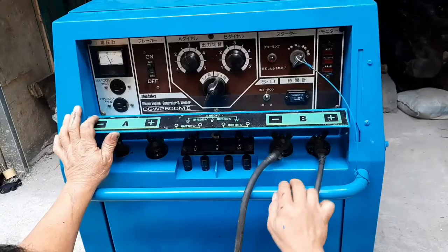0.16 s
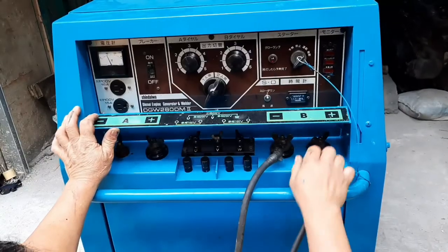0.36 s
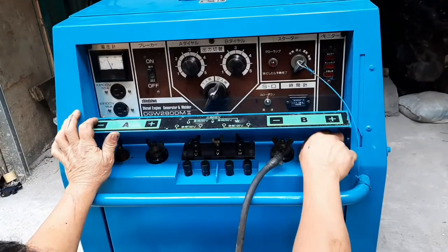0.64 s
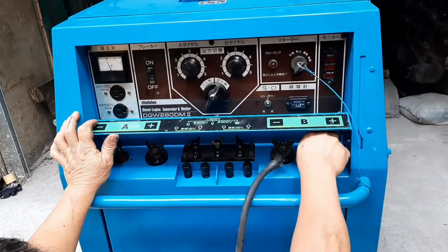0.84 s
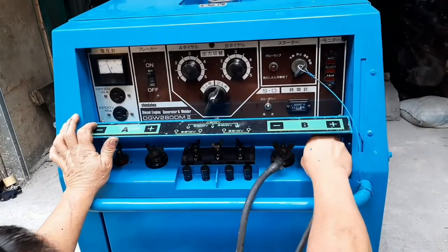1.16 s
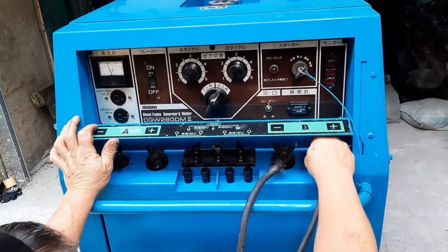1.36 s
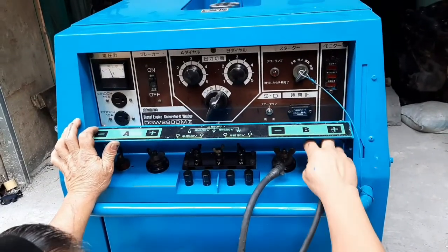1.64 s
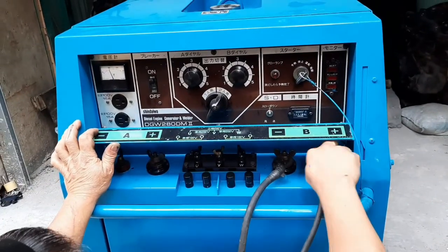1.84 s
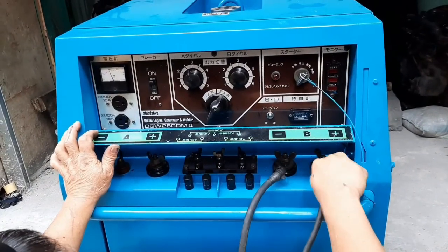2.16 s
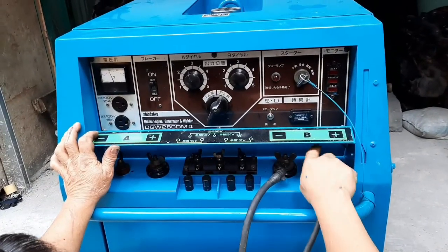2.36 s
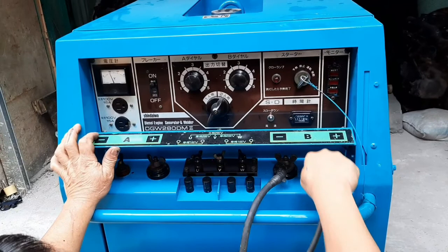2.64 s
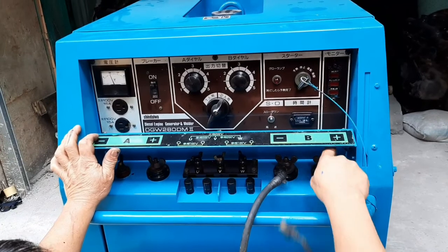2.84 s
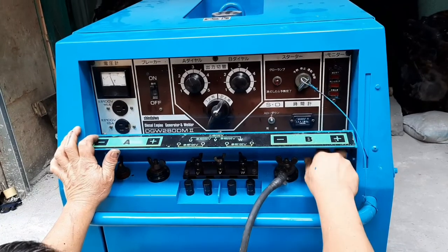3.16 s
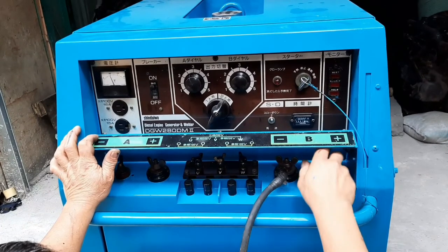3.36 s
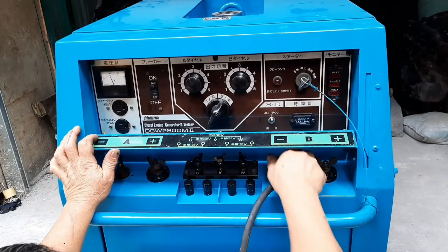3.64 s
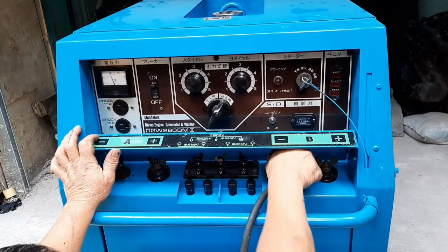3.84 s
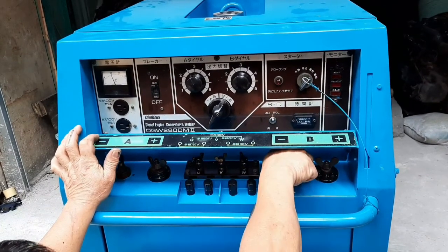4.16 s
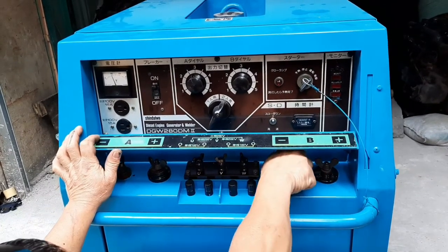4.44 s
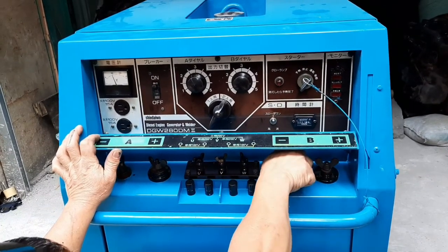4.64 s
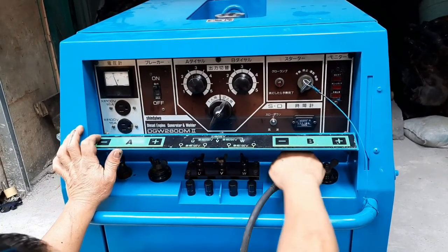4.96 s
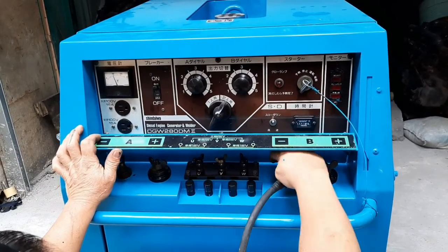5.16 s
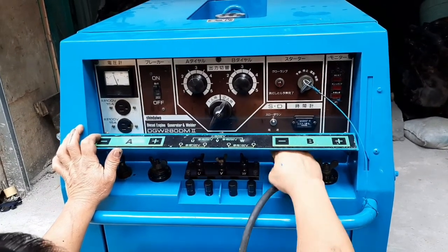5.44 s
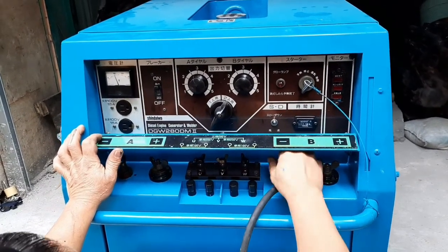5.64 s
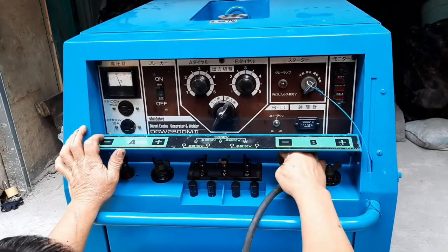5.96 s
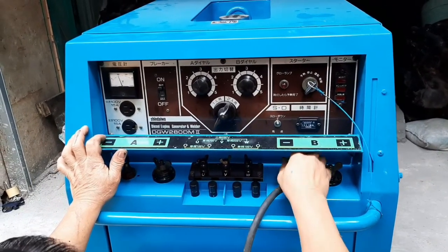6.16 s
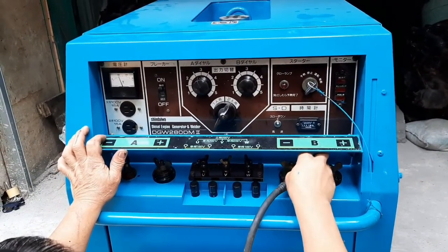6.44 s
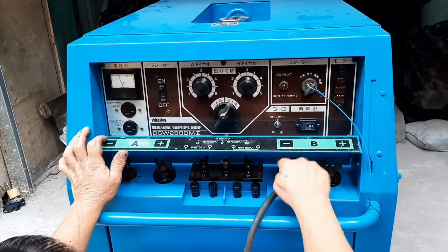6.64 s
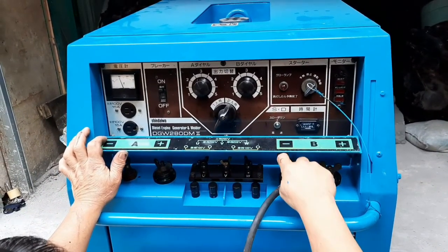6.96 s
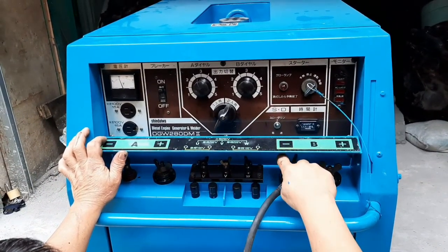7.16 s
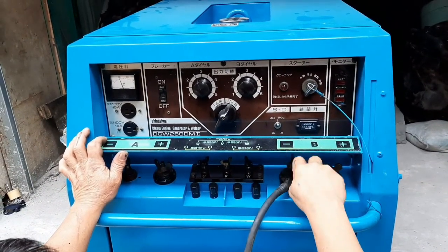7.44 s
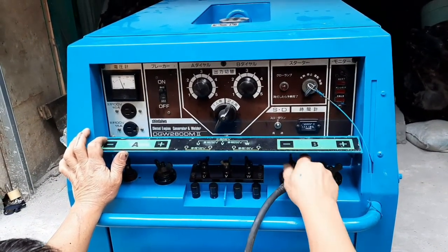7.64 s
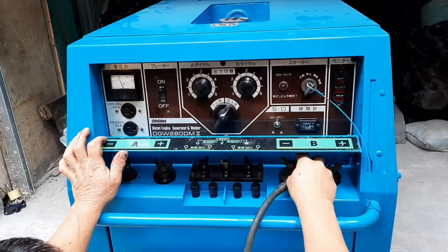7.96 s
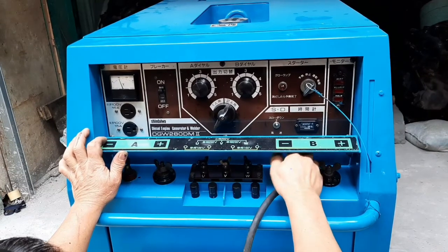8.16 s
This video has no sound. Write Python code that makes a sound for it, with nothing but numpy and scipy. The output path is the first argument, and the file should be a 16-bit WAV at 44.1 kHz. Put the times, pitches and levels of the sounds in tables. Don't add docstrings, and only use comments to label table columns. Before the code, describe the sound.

A three-cylinder diesel generator runs very close, rising slightly in speed during the first second, then holding a dense, even drone. Fan and exhaust air rush, valves knock, gears whine and the metal canopy booms and chatters. Small scrapes and clicks of cable plugs being twisted are half buried in the roar. Stereo microphone at arm's length outdoors on concrete, with light low wind buffets.

```python
import sys
import numpy as np
from scipy import signal
from scipy.fft import rfft, irfft, next_fast_len
from scipy.io import wavfile
from scipy.ndimage import uniform_filter1d

SR = 44100
rng = np.random.default_rng(int(sys.argv[2]) if len(sys.argv) > 2 else 0)


def amplitude_ratio(level_db):
    exponent = np.asarray(level_db, float) / 20
    return 10 ** exponent


def dump(signal):
    limited = np.clip(np.atleast_2d(signal).T, -1, 1)
    pcm = np.round(limited * 32767).astype(np.int16)
    wavfile.write(sys.argv[1], SR, pcm)


N = 366030


def evened(x):
    return x / np.sqrt(np.mean(x ** 2, axis=-1, keepdims=True) + 1e-20)


def read(points, hz, column=1):
    columns = np.transpose(points)
    return np.interp(np.log(hz + 1), np.log(columns[0] + 1), columns[column])


def coloured(x, points):
    length = x.shape[-1]
    size = next_fast_len(length)
    gain = amplitude_ratio(read(points, np.fft.rfftfreq(size, 1 / SR)))
    return irfft(rfft(x, size) * gain, size)[..., :length]


def drift(top_hz, count=1):
    steps = np.arange(0, N + 256, 256)
    spectrum = rfft(rng.standard_normal((count, len(steps))))
    hz = np.fft.rfftfreq(len(steps), 256 / SR)
    slow = evened(irfft(spectrum / (1 + (hz / top_hz) ** 4), len(steps)))
    return np.array([np.interp(np.arange(N), steps, row) for row in slow])


def bumps(rows, column):
    out = np.zeros(N)
    for row in rows:
        centre_s, length_s = row[:2]
        u = np.arange(0, 3 * length_s, 1 / SR) / (0.3 * length_s)
        swell = amplitude_ratio(row[column]) * u * np.exp(1 - u)
        part = out[round((centre_s - .4 * length_s) * SR):][:len(u)]
        part += swell[:len(part)]
    return out


# frequency in Hz, likeness 0-1, left-right level in dB.
PORT_LIKENESS = [(60, 0.74, 7), (130, 1, 1), (290, 0.96, -1.5), (640, 0.74, 8), (1100, 1, 2.5),
                 (2520, 0.14, -5.5), (4420, 0.038, 0), (8600, 0.024, 6.5), (15000, 0.058, 5.5)]


def port_noise():
    a, b = rfft(rng.standard_normal((2, N)))
    hz = np.fft.rfftfreq(N, 1 / SR)
    same = np.clip(read(PORT_LIKENESS, hz), -1, 1)
    lean = amplitude_ratio(read(PORT_LIKENESS, hz, column=2) / 2)
    lead_s = 1.2e-4
    left = a * lean * np.exp(2j * np.pi * hz * lead_s)
    right = (same * a + np.sqrt(1 - same ** 2) * b) / lean
    return irfft([left, right], N)


# time in seconds, speed in rpm.
SPEED = [(.03, 1891.4), (.25, 1932.5), (.5, 1958.5), (.82, 1974.5), (1.25, 1971.6), (1.75, 1978.7),
         (2.5, 1975.2), (2.85, 1977.7), (3.8, 1977.8), (4.25, 1975.6), (4.7, 1979.2), (5.25, 1975.2),
         (5.55, 1980.0), (6.25, 1973.8), (6.5, 1976.2), (7.25, 1976.4), (7.65, 1980.6), (8.3, 1970.5)]
# speed in rpm, level in dB.
EXHAUST_BOOM = [(1945, -24), (1974, -26.3)]
# speed in rpm, level in dB.
PUMP_WHINE = [(1915, -40), (1934, -42), (1944, -50), (1958, -48), (1970, -42.5), (1980, -41)]
PUMP_LEAD = [(1905, 1.3), (1958, 3.8), (1976, 3.1), (1980, 4.0)]
# speed in rpm, level in dB.
TIMING_WHINE = [(1920, -58), (1950, -48), (1973, -51), (1979, -43)]


def crank():
    rpm = np.interp(np.arange(N) / SR, *np.transpose(SPEED))
    laws = (EXHAUST_BOOM, PUMP_WHINE, PUMP_LEAD, TIMING_WHINE)
    gears = [np.interp(rpm, *np.transpose(law)) for law in laws]
    return np.cumsum(rpm) / (120 * SR), rpm, gears


def order_tone(cycles, multiple, db, lean_db, lead_rad):
    chance = rng.random()
    start = multiple ** 2 / 21 + .1 * chance if multiple < 33 else chance
    turn = 2 * np.pi * (multiple * cycles + start)
    lean = amplitude_ratio(lean_db)
    pair = np.array([lean * np.cos(turn + lead_rad), np.cos(turn)])
    return 2 * amplitude_ratio(db) / np.hypot(1, lean) * pair


# multiple of the four-stroke cycle, level in dB rms, left-right in dB, left lead in rad.
FIRING_ORDERS = [(3, -35, 1, 0.1), (9, -39, 1, 0.0), (12, -44, 1, 0.0), (15, -37, 2, -0.2),
                 (18, -39, 1, 0.2), (21, -34, 7, -0.1), (24, -36, 3, -0.1), (27, -43, 4, -0.1),
                 (30, -50, 5, 0.2), (36, -49, 2, -0.3), (42, -49, 2, -0.7), (45, -51, 9, 0.8),
                 (48, -55, 14, -3.1), (51, -50, -3, -0.6), (54, -52, 15, -2.5), (60, -55, -3, 1.4),
                 (78, -53, -3, -2.5), (81, -57, -1, 1.0)]
# cycle multiple, level in dB
# rms, left-right in dB, left lead in rad.
BLOCK_ORDERS = [(11, -44, 2, -0.2), (13, -41, 1, -0.0), (16, -38, 2, 0.3), (17, -41, 0, 0.0),
                (19, -38, 0, -0.2), (20, -40, 2, 0.2), (22, -37, 1, -0.3), (23, -41, -4, 0.1),
                (25, -37, 3, -0.4), (26, -41, 6, -0.6), (28, -46, 4, -0.2), (29, -44, 2, 0.4),
                (31, -45, 0, 0.7), (32, -43, 5, 0.6), (34, -46, 8, -0.2), (35, -42, 7, -0.1),
                (37, -38, 5, 0.1), (40, -46, 4, 0.1), (41, -48, 5, 0.2), (43, -51, 3, 1.4),
                (44, -41, 5, -0.4), (46, -45, 5, -0.4), (47, -49, 3, -0.1), (50, -46, 1, 0.0),
                (53, -55, 3, -0.2), (56, -53, -2, 1.4), (62, -56, 2, 2.3), (64, -56, -6, -1.0),
                (70, -54, 1, -1.4), (76, -53, 4, 0.1),
                (4, -49, 1, 0), (8, -52, 1, 0), (38, -53, 3, 0), (39, -57, 3, 0), (49, -56, 3, 0),
                (57, -58, 2, .5), (63, -61, 1, 0), (66, -63, 1, 0)]
# cycle multiple, level in dB rms, left-right in dB, left lead in rad.
CLATTER_ORDERS = [(90, -62, -1, 1.5), (91, -57, 6, 0.2), (93, -57, 5, 0.3), (96, -59, -3, 1.1),
                  (98, -62, 8, 3.0), (100, -59, 0, -2.4), (120, -56, -6, -2.1), (121, -53, -10, 0.2),
                  (122, -56, -11, 0.9), (123, -55, -8, 1.6), (128, -54, -14, -0.7), (129, -54, 1, 1.2),
                  (132, -57, 13, -2.3), (135, -53, -16, 0.1), (136, -56, -12, 0.6), (137, -57, -17, 0.3),
                  (138, -56, -18, -1.1), (139, -55, 1, 1.4), (145, -54, -10, -2.2), (147, -57, -6, 1.0),
                  (151, -54, -8, 1.1), (152, -56, -13, -1.6), (153, -54, -3, 0.3), (159, -56, -3, -0.8),
                  (160, -57, -8, 0.7), (163, -56, -8, 1.8), (165, -56, -14, 1.6), (167, -56, -2, 0.0)]
# cycle multiple, change in dB at 1905 rpm, change in dB at 1940 rpm.
SETTLING = [(3, 5, 3), (13, 4, 7), (16, 1, 5), (18, 6, 0), (20, -5, 6), (21, -10, 3), (26, 5, 3),
            (27, -10, -3), (29, -4, -7), (31, 6, 5), (41, 0, 3), (46, -3, -4), (47, 0, 4), (35, -8, -7),
            (36, -7, -4), (37, -8, 0), (38, 8, 7), (39, 9, 11), (43, 6, 8), (44, -12, -5), (45, -8, 6),
            (49, 5, 7), (56, 4, 10), (57, 7, 7), (63, 10, 4), (66, 10, 2), (70, -12, 1)]


def drone(cycles, rpm, gears):
    boom_db, pump_db, pump_lead_rad, timing_db = gears
    waver_db = .7 * drift(3, count=8)
    swept_db = {k: np.interp(rpm, [1905, 1940, 1970], [low_db, mid_db, 0]) for k, low_db, mid_db in SETTLING}
    out = order_tone(cycles, 6, boom_db, 1.3, .14)
    for k, db, lean_db, lead_rad in FIRING_ORDERS + BLOCK_ORDERS + CLATTER_ORDERS:
        wander_db = waver_db[k % 8] * min(k / 20, 2)
        out += order_tone(cycles, k, db + swept_db.get(k, 0) + wander_db, lean_db, lead_rad)
    fan_db = -28 + 1.6 * waver_db[0] + np.interp(rpm, [1930, 1960], [-14, 0])
    out += order_tone(cycles, 12.257, fan_db, 1, .1)
    out += order_tone(cycles, 68, pump_db, 1.5, pump_lead_rad)
    cold_db = np.interp(cycles, [22, 28], [-2, 0])
    return out + order_tone(cycles, 116, timing_db + cold_db, 2, .1)


# place in the cycle 0-1, level in dB.
KNOCKS = [(.1, 1), (.15, 3), (.22, 2), (.27, 0), (.49, 7), (.56, 2), (.63, 2), (.7, 2), (.8, 1), (.89, 7),
          (.96, 0)]
# frequency in Hz, level in dB.
CASING = [(700, -40), (900, -12), (1300, -12), (1450, -14), (1900, -4), (2200, -1), (2800, 0), (3250, -10),
          (3700, -22), (7000, -30), (9000, -48)]


def knocks(cycles):
    t = np.arange(1800) / SR
    out = np.zeros((2, N))
    for place, db in KNOCKS:
        at = np.flatnonzero(np.diff(np.floor(cycles - place)))
        train = np.zeros(N)
        train[at] = amplitude_ratio(db + 2.5 * rng.standard_normal(len(at)))
        decay = amplitude_ratio(-60 * t / 0.03)
        rise = 1 - np.exp(-t / 0.0015)
        ring = rng.standard_normal((2, len(t))) * decay * rise
        out += signal.oaconvolve(train[None], ring, axes=1)[:, :N]
    level_db = -43.5
    return amplitude_ratio(level_db) * evened(coloured(out, CASING)) * amplitude_ratio([[-1], [1]])


# frequency in Hz, density in dB per Hz.
ROAR = [(15, -94), (35, -79), (50, -63), (70, -60), (135, -60), (200, -54), (280, -53.5), (360, -56.5),
        (400, -56), (480, -62.5), (700, -74), (800, -69), (1200, -72.5), (1600, -109)]
# frequency in Hz, density in dB per Hz.
HISS = [(900, -94), (1200, -77), (1450, -75.5), (2000, -71), (2600, -70.5), (3100, -76), (3600, -80.5),
        (5000, -85.5), (7000, -91.5), (9300, -100), (11000, -98), (14500, -100), (15200, -104),
        (15600, -112)]
# frequency in Hz, width in Hz, level in dB rms.
PANELS = [(151.2, 9.4, -34.5), (402.5, 5.7, -42), (1538, 46, -56), (2400, 54, -76), (2480, 81, -67),
          (4260, 30, -65), (4980, 120, -61), (5980, 75, -64), (6900, 140, -65)]


def air():
    per_hz = np.sqrt(SR / 2)
    flicker_db = 1.3 * np.tanh(0.15 * drift(9)[0] + 0.8 * drift(20)[0])
    roar = coloured(port_noise(), ROAR) * per_hz
    hiss = coloured(port_noise(), HISS) * per_hz * amplitude_ratio(flicker_db)
    hz = np.fft.rfftfreq(N, 1 / SR)
    push = rfft(port_noise())
    shape = sum(amplitude_ratio(db) / np.sqrt(width) / (1 + (2 * (hz - f) / width) ** 2) for f, width, db in PANELS)
    return roar + hiss + irfft(push * shape, N) * per_hz


# frequency in Hz, width in Hz, level in dB.
BOOM_MODES = [
    (171.8, 9.4, -3.5),
    (319.5, 38, -3),
]
# centre in seconds, level in dB.
LOW_BUFFETS = [(.76, -22.5), (1.29, -23.5), (1.45, -36), (1.65, -26), (1.76, -28), (1.92, -28), (2.17, -31),
               (2.42, -31), (2.63, -42), (2.88, -27), (3.03, -26), (3.17, -34), (3.27, -37), (4.08, -31),
               (4.3, -30), (4.53, -27), (4.71, -29), (5.09, -30), (5.25, -33), (5.53, -25), (5.76, -29),
               (6.01, -35), (6.34, -43), (6.49, -29), (6.62, -28), (6.72, -21), (6.88, -31), (7.1, -31),
               (7.67, -26), (8.05, -29), (8.27, -27)]
# centre in seconds, level in dB.
HIGH_BUFFETS = [(.27, -34), (.36, -24), (1.4, -23), (1.62, -25), (1.91, -19), (2.15, -24), (2.26, -28),
                (2.58, -25), (2.72, -28), (2.9, -30), (3.68, -23), (3.91, -24), (4.04, -18), (4.22, -26),
                (4.4, -26), (4.66, -26), (4.85, -28), (5.13, -26), (5.25, -25), (5.55, -29), (5.84, -25),
                (5.91, -29), (6.26, -27), (7.07, -25), (7.61, -43), (8.14, -23)]


def booms():
    steady_db, lump_db, lump_hz = np.array([[-29.5], [-31.5]]), 2, 4.8
    steady = amplitude_ratio(steady_db + lump_db * drift(lump_hz, count=2))
    low = bumps([(s, 0.13, db) for s, db in LOW_BUFFETS], column=2)
    high = bumps([(s, 0.066, db) for s, db in HIGH_BUFFETS], column=2)
    levels = steady + np.array([low, high])
    hz = np.fft.rfftfreq(N, 1 / SR)
    push = rfft(port_noise())
    out = np.zeros((2, N))
    for (f, width, db), level in zip(BOOM_MODES, levels):
        ring = evened(irfft(push / (1 + (2 * (hz - f) / width) ** 2), N)[None])[0]
        swell = np.sqrt(uniform_filter1d((ring ** 2).mean(0), size=4000) + 0.061)
        out += ring / swell * amplitude_ratio([[.6], [-.6]]) * amplitude_ratio(db) * level
    return out


# centre in seconds, level in dB.
RATTLES = [(.86, -53), (.92, -45), (.96, -47), (1.05, -50), (1.1, -43), (1.17, -43), (1.26, -46),
           (1.35, -54), (1.41, -50), (1.82, -36), (2.12, -40), (2.6, -38), (2.96, -47), (3.78, -37.5),
           (4.54, -37), (5.33, -36), (5.72, -37.5), (5.78, -44), (5.94, -42), (6.64, -37), (6.9, -44),
           (7.23, -37), (7.27, -39), (7.36, -45), (7.53, -45), (7.62, -39), (7.66, -40), (8.0, -41)]
# frequency in Hz, level in dB.
SHEET = [(1000, -45), (1500, -30), (1900, -4), (2500, 0), (3000, -3), (3500, -12), (4200, -32), (7000, -65)]


def rattle(cycles):
    chatter_db, swing_db = -48.5, 14
    clumps = bumps([(s, .045, db) for s, db in RATTLES], column=2)
    lumps = amplitude_ratio(chatter_db + 6 * np.tanh(.8 * drift(16)[0]))
    since_firing = (3 * cycles - .45) % 1
    shaken = amplitude_ratio(-swing_db * uniform_filter1d(since_firing - .5, size=90))
    grain = amplitude_ratio(4 * np.tanh(.8 * drift(60)[0]))
    return evened(coloured(port_noise(), SHEET)) * (clumps + lumps) * shaken * grain


# centre in seconds, length in seconds, scrape in dB, rustle in dB.
RUBS = [(.25, .03, -45, -66), (.67, .03, -66, -49), (1.1, 0.033, -47, -66), (2.7, .03, -45, -63),
        (2.89, .07, -56, -57), (3.2, .05, -48, -49), (3.255, .045, -47, -46), (4.2, .04, -57, -60),
        (4.27, .025, -58, -59), (4.385, .04, -43, -54), (4.51, .015, -44, -46), (4.63, .03, -51, -64),
        (5.32, 0.022, -45, -54), (5.39, .025, -55, -52), (5.71, .04, -49, -61), (5.91, 0.067, -45, -56),
        (6.64, .04, -48, -65), (7.27, 0.11, -48, -61), (7.46, 0.078, -44, -54), (8.28, .03, -46, -59)]
# frequency in Hz, level in dB.
SCRAPE = [(1200, -20), (2500, -4), (3600, -2), (4400, 0), (5500, -5), (7000, -11), (10000, -30)]
# frequency in Hz, level in dB.
RUSTLE = [(4000, -22), (7000, -5), (10000, -3), (14000, 0), (15600, -3)]
# start in seconds, level in dB, ring in Hz, 60 dB decay in seconds.
CLICKS = [(3.199, -24, 2500, .012), (3.204, -27, 1720, .012), (6.1, -33, 1200, .015),
          (3.288, -33, 2600, .012), (5.314, -27, 1980, .02), (5.315, -30, 1150, .015),
          (4.715, -29, 705, .11), (2.78, -28, 562, .16), (1.92, -29, 515, .14), (3.198, -29, 1200, .015),
          (3.2, -27, 2050, .015), (4.365, -46, 3700, .07), (4.39, -44, 4200, .05), (4.39, -46, 3720, .05),
          (4.39, -51, 5300, .05), (4.38, -52, 4800, .03), (5.312, -45, 4200, .03), (5.323, -32, 2100, .015),
          (5.305, -34, 2700, .015), (2.0, -22, 298, .28), (3.5, -29, 560, .18)]


def hand():
    grain = amplitude_ratio(3 * np.tanh(drift(80, count=2)))
    out = evened(coloured(port_noise(), SCRAPE)) * bumps(RUBS, column=2) * grain[0]
    out += evened(coloured(port_noise(), RUSTLE)) * bumps(RUBS, column=3) * grain[1]
    t = np.arange(12000) / SR
    for s, db, hz, t60 in CLICKS:
        rise = 1 - np.exp(-10 * t / t60)
        ring = 3 * amplitude_ratio(db - 60 * t / t60) * rise * np.sin(2 * np.pi * hz * t)
        out[:, round(s * SR):][:, :len(t)] += ring
    return out


# centre in seconds, length in seconds, left in dB, right in dB.
GUSTS = [(.83, .06, -46, -48), (1.34, 0.091, -39, -38), (1.92, 0.14, -27, -40), (2.05, .1, -42, -37),
         (2.42, .05, -27, -44), (2.59, .05, -41, -41), (3.67, .06, -42, -42), (6.18, 0.079, -37, -51),
         (6.32, 0.4, -33, -26), (6.7, 0.18, -50, -39), (6.94, .06, -51, -40), (7.42, .06, -45, -29),
         (7.73, .08, -45, -33)]
# frequency in Hz, level in dB.
BUFFET = [(20, -22), (45, -3), (100, 0), (200, -6), (350, -15), (600, -45), (1500, -95)]


def wind():
    lumps = evened(coloured(rng.standard_normal((2, N)), BUFFET))
    return lumps * np.array([bumps(GUSTS, column=2), bumps(GUSTS, column=3)])


def scene():
    cycles, rpm, gears = crank()
    machine = drone(cycles, rpm, gears) + knocks(cycles) + air() + booms() + rattle(cycles)
    return machine + hand() + wind()


def low_pass(x):
    return signal.sosfilt(signal.butter(12, 15590, fs=SR, output="sos"), x)


def record(dry):
    start_s, fade_s = .0235, .003
    gate = np.clip((np.arange(N) / SR - start_s) / fade_s, 0, 1)
    return low_pass(dry * gate)


dry = scene()
out = record(dry)
dump(out)
```